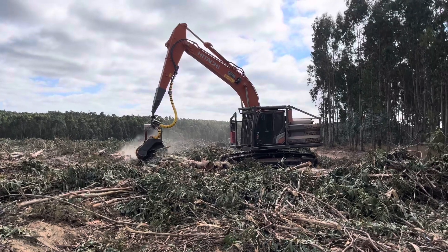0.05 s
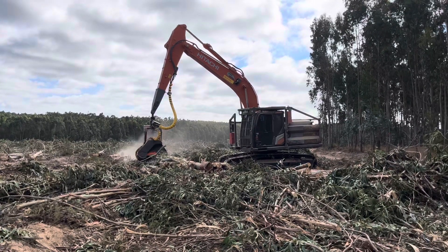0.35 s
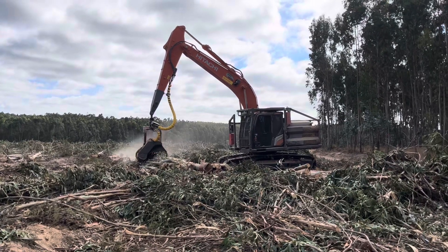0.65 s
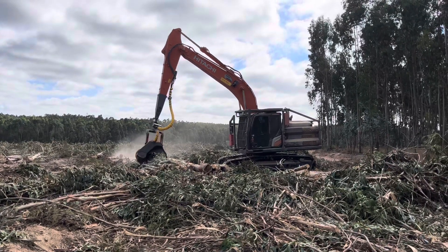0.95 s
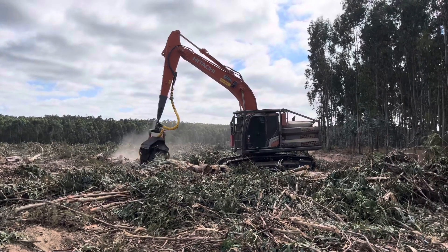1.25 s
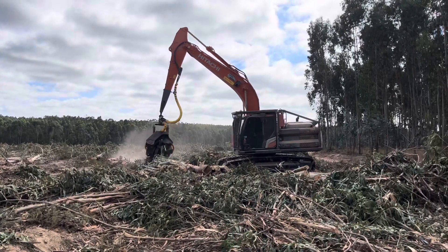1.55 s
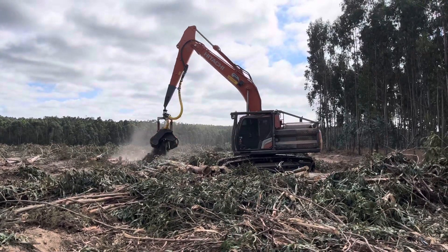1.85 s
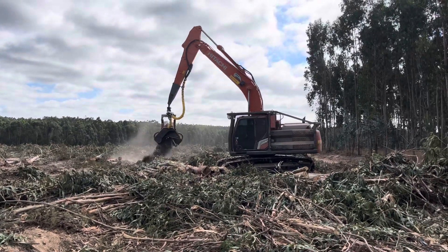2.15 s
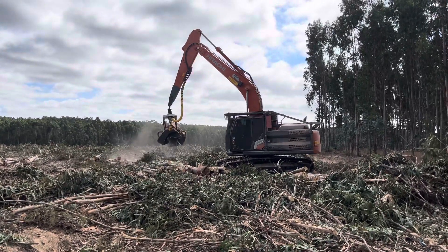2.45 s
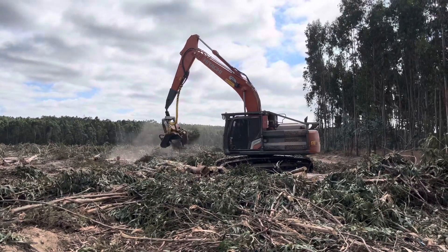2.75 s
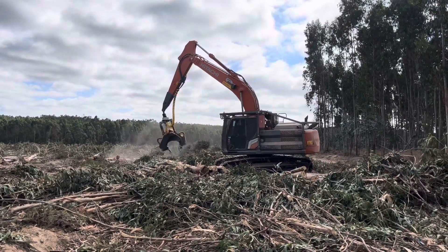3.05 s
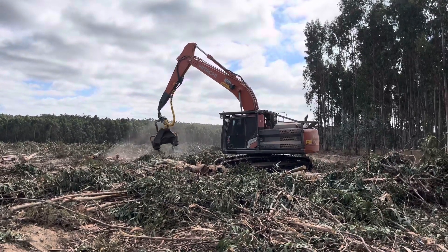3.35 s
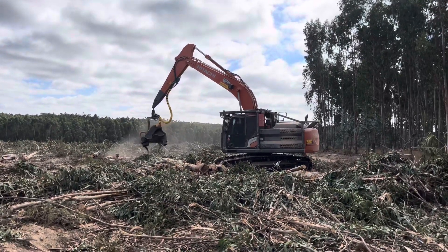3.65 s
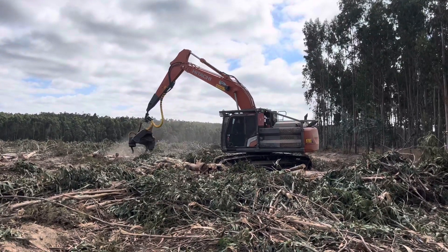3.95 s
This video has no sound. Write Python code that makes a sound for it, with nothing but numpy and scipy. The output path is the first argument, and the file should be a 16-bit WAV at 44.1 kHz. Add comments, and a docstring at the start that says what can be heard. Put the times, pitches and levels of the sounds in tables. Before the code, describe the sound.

A tracked excavator's diesel engine drones some way off in a cleared wood. Something briefly rubs beside the microphone with two soft bumps, then hydraulics whirr and hiss as logs thud and the harvesting head knocks and clacks.

```python
"""The diesel engine of a tracked excavator drones and roars some way off in a cleared wood.
Periodic firing gives the drone, the fan adds broadband noise, and the hydraulic pump hums and whirrs
at multiples of the shaft speed. Oil hisses as the boom moves, the machine groans under load, logs thud,
and the harvesting head knocks and clacks. In the first second something rubs right beside the
microphone, like a sliding hand, with two soft, dull bumps."""
import sys
import numpy as np
from scipy import signal
from scipy.fft import rfft, irfft
from scipy.io import wavfile

SR = 44100
rng = np.random.default_rng(int(sys.argv[2]) if len(sys.argv) > 2 else 0)


def int16_out(signal):
    """Quantize to a 16-bit WAV file."""
    q = np.round(np.clip(np.atleast_2d(signal).T, -1, 1) * 32767)
    wavfile.write(sys.argv[1], SR, q.astype(np.int16))


N = 176400
T, HZ = np.arange(N) / SR, np.fft.rfftfreq(N, 1 / SR)

# Noise spectra. Each row: frequency in Hz, relative spectral density in dB.
HISS_SPECTRUM = [(1500, -25), (3600, 2), (5000, -5), (6200, -4), (8300, -7.5), (9300, -2), (11000, 0),
                 (12000, -5.5), (13000, -24), (13600, -45)]
THUD_SPECTRUM = [(30, -28), (80, 4), (150, -9.5), (270, -3.5), (380, -6.5), (900, -19), (9000, -90)]
DULL_IMPACT_SPECTRUM = [(150, -10), (450, -6.5), (750, 5), (1000, -11), (1350, -18), (2500, -16),
                        (12000, -55)]
CRACK_SPECTRUM = [(500,-6),(1600,5),(3700,-4.5),(9000,-38)]
RUB_SPECTRUM = [(900,-9),(1500,-7),(2250,-2.5),(2750,-8),(3600,0),(5100,-2.5),(5900,-7.5),(7200,-7.5),(9000,-11),(10800,-2),(12000,-10),(13200,-20),(14500,-46)]
ROAR_SPECTRUM = [(20,-36),(30,-22),(45,3.5),(95,0.5),(220,-2.5),(265,-1.5),(345,-5.5),(430,0),(600,0),(760,0),(860,-3),(940,-14),(1020,-14.5),(1150,-6.5),(1330,-5),(1520,-14),(1800,-12),(2100,-15.5),(2550,-14),(3000,-22.5),(3700,-20.5),(4900,-23.5),(5800,-32),(7500,-37.5),(11500,-52),(13600,-69)]
RUMBLE_SPECTRUM = [(20, -34), (45, -7.5), (75, 6), (150, 2.5), (260, -5.5), (380, -32), (800, -58)]
# Envelopes. Each row: time in seconds, gain in dB.
GROAN_GAIN = [(.3,-33.5),(.42,-42.5),(.8,-38),(1.3,-47)]
HISS_GAIN = [(1.3, -51), (1.55, -44), (2.25, -45.5), (2.45, -48.5), (3.05, -44.5), (3.3, -45), (3.8, -42.5),
             (4, -45)]
WHIRR_GAIN = [(.8,-52),(1,-39),(1.35,-42),(2.55,-40),(3.1,-52)]
RUB_PRESSURE = [(.08, -69), (.12, -41.5), (.195, -26), (.24, -23), (.258, -18.5), (.28, -21), (.325, -26),
                (.348, -24), (.38, -30.5), (.47, -33), (.54, -36), (.575, -32.5), (.62, -40.5),
                (.68, -46.5), (.72, -35), (.785, -36), (.805, -39.5), (.9, -57)]
DRONE_GAIN = [(0,-33),(.18,-27.5),(.42,-28),(.53,-39),(.8,-57),(.9,-42.5),(1.8,-37.5),(2.2,-45.5),(2.6,-33),(2.75,-36.5),(3.29,-32),(3.39,-49),(3.68,-34),(4,-43)]
HUM_GAIN = [(.6,-2),(.9,-6),(1.55,-2.5),(2.7,-1),(4,-4)]
ROAR_GAIN = [(0, -33), (.4, -31), (.7, -32), (1.15, -31), (1.6, -29.5), (2, -30), (2.5, -29), (3.2, -28),
             (4, -28.5)]
RUMBLE_GAIN = [(0, -35), (.28, -30.5), (.7, -40.5), (.95, -35.5), (1.15, -48.5), (1.9, -37.5), (2.3, -44),
               (2.7, -45), (3.22, -32.5), (3.5, -40.5), (4, -35)]
# Far and near sound at the two microphone ports. Each row: frequency in Hz, coherence from 0 to 1,
# phase lead of the left in radians, left minus right level in dB.
FAR_FIELD = [(60,.65,-.2,.6),(160,.5,-1,0),(320,.78,0,-.3),(780,.96,.2,.6),(980,.25,-.3,.5),(1250,.94,.1,1.2),(1520,.45,1.2,2.5),(1750,.65,-1,7),(2050,.6,.9,-3),(2550,.75,1.4,-2),(2800,.46,.3,-6),(3700,.7,.8,-1.5),(5000,.43,1.7,4),(6000,.24,4,5.5),(7950,1,3.14,0),(9000,.72,1.95,-.7),(11200,.96,.1,0)]
NEAR_FIELD = [(1500,.4,-1,-3),(2300,.85,-.5,0),(3000,.72,.8,-1.5),(4100,.68,2.2,-6),(5100,.75,2,2),(6000,.35,3.8,3),(9000,.8,2,0),(10800,.78,.4,0),(12000,.92,-.1,0)]
# Log impacts. Each row: peak time in seconds, level in dB, pitch at the peak in Hz.
LOG_THUDS = [(0.264,-24,110),(.452,-20.5,170),(0.514,-25,170),(.777,-22.5,245),(.843,-25.5,130),(.992,-28,190),(1.297,-29,290),(1.465,-25,190),(1.614,-29.5,140),(1.773,-26,290),(1.859,-30.5,290),(1.886,-24,140),(1.943,-25,185),(2.872,-28.5,170),(3.218,-20,68.2),(3.332,-25,180)]
# Two soft bumps of the rubbing beside the microphone, then three knocks of the head on wood.
# Each row: peak time in seconds, level in dB, rise and decay times in seconds.
DULL_IMPACTS = [(0.569,-22.5,0.0085,0.033),(0.777,-28.5,0.02,0.011),(1.509,-25.5,.01,.02),(1.665,-29,0.0071,.015),(2.635,-34,.001,0.0038)]
# Snaps, clacks and a scrape. Each row: peak time in seconds, level in dB, ring in Hz, decay in seconds.
CLACK_EVENTS = [(0.555,-32.5,3510,0.0095),(0.783,-30.5,3430,0.012),(.99,-40,2320,0.012),(1.705,-34,2790,0.06),(2.793,-28,2300,0.0046),(2.813,-33,2260,0.0077),(2.823,-42,1900,.005),(2.843,-37,1360,.008)]
# Resonances of the rubbed body. Each row: frequency in Hz, width in Hz, boost in dB.
RUB_MODES = [(2290,110,6),(2880,140,9),(3450,100,7.5),(4600,62,7),(5120,98,6)]
# Engine speed. Each row: time in seconds, shaft turns per second.
SHAFT_SPEED = [(0, 31), (.45, 34.2), (.7, 32.3), (.95, 31.9), (2, 32.65), (3, 32.9), (4, 33.2)]
# Engine and pump tones. Each row: multiple of the shaft speed, relative level in dB.
HUM_ORDERS = [(9,-41.5),(16,-44.5),(18,-42.5),(23,-45),(24,-44),(36,-55)]
WHIRR_ORDERS = [(24.7, -1), (39.3, -6.5)]


def amp(db):
    """Amplitude grows tenfold for every 20 dB."""
    return 10 ** (np.asarray(db) / 20)


def unit(x):
    """Normalisation brings the rms to 1."""
    return x / np.sqrt(np.mean(x ** 2) + 1e-20)


def curve(points):
    """Linear interpolation turns a table into a control through time."""
    return np.interp(T, *np.transpose(points))


def spectrum(points, column=1):
    """Interpolation in log frequency spreads one column over the spectrum."""
    table = np.transpose(points)
    return np.interp(np.log(HZ + 1), np.log(table[0]), table[column])


def wander(rate_hz):
    """Low-passed noise gives a random fluctuation of rms 1."""
    hz = HZ[:N // 20]
    real, imag = rng.standard_normal((len(hz), 2)).T
    return unit(irfft((real + 1j * imag) / (1 + (hz / rate_hz) ** 4), N))


def noise(colour_db, field, drive=1):
    """Coloured noise of rms 1 reaches the two ports with partial coherence."""
    left, independent = rfft(rng.standard_normal((2, N)) * drive)
    coherence = np.clip(spectrum(field, column=1), 0, 1)
    right = coherence * left + np.sqrt(1 - coherence ** 2) * independent
    right *= np.exp(-1j * spectrum(field, column=2))
    balance = amp(spectrum(field, column=3) / 2)
    pair = np.array([left * balance, right / balance]) / np.sqrt(balance ** 2 + balance ** -2)
    return unit(irfft(pair * amp(colour_db), N))


def tone(turns, flutter=0.52, drift=0.15, apart=0.093, rasp=0.75):
    """Random amplitude and phase modulation make a tone waver and rasp, differently at each port."""
    shared = 1 + flutter * wander(6.0) + 1j * drift * wander(5.9)
    shared += rasp * (wander(19.7) + 1j * wander(23.4))
    per_port = np.array([wander(4.2) + 1j * wander(5.4) for _ in range(2)])
    return unit(((shared + apart * per_port) * np.exp(2j * np.pi * turns)).real)


def blow(peak_s, rise_s, decay_s):
    """An impact grows exponentially to its peak, then decays by damping."""
    return np.exp(np.minimum((T - peak_s) / rise_s, (peak_s - T) / decay_s))


def ring(hz, spread_turns=0.17):
    """One mode of a struck body reaches the two ports with a phase difference."""
    turns = np.cumsum(hz) / SR + rng.random() + spread_turns * rng.standard_normal((2, 1))
    return unit(np.sin(2 * np.pi * turns))


def groan(centre_hz=266.6, half_width_hz=27):
    """A low resonance of the loaded machine passes a narrow band of noise."""
    resonance_db = -20 * np.log10(1 + ((HZ - centre_hz) / half_width_hz) ** 2)
    return noise(resonance_db, FAR_FIELD) * amp(curve(GROAN_GAIN))


def oil_hiss(flicker_db=0.94):
    """Oil flowing through the valves radiates high-frequency noise as the boom moves."""
    return noise(spectrum(HISS_SPECTRUM), FAR_FIELD) * amp(curve(HISS_GAIN) + flicker_db * wander(28))


def pump_whirr(shaft_turns):
    """The loaded pump sounds rough tones whose frequencies are proportional to the shaft speed."""
    tones = sum(amp(db) * tone(order * shaft_turns) for order, db in WHIRR_ORDERS)
    return tones * amp(curve(WHIRR_GAIN))


def logs(max_fall_octaves_per_s=34):
    """Heavy damping leaves each tumbling log a few cycles of falling pitch in a dull puff of noise."""
    puff = noise(spectrum(THUD_SPECTRUM), FAR_FIELD) * amp(-5)
    thuds = 0
    for peak_s, db, hz in LOG_THUDS:
        octaves = np.clip(max_fall_octaves_per_s * rng.random() * (peak_s - T), -1, 1)
        envelope = amp(db) * blow(peak_s, rise_s=0.004, decay_s=0.0089)
        thuds += envelope * (puff + ring(hz * 2 ** octaves))
    return thuds


def bumps_and_knocks():
    """Damped contacts give dull noise bursts: the close rubbing bumps; later the head knocks on wood."""
    blows = sum(amp(db) * blow(peak_s, rise_s, decay_s) for peak_s, db, rise_s, decay_s in DULL_IMPACTS)
    return noise(spectrum(DULL_IMPACT_SPECTRUM), FAR_FIELD) * blows


def snaps_and_clacks(pitch_jitter=0.01455):
    """Impacts excite damped vibration: sticks snap, and the steel of the head clacks and scrapes."""
    crack = noise(spectrum(CRACK_SPECTRUM), FAR_FIELD)
    clacks = 0
    for peak_s, db, hz, decay_s in CLACK_EVENTS:
        ringing = amp(-1) * ring(hz * (1 + pitch_jitter * wander(146)))
        clacks += (crack + ringing) * amp(db) * blow(peak_s, 0.2 * decay_s, decay_s)
    scrape = noise(spectrum(HISS_SPECTRUM), FAR_FIELD) * amp(-38.5)
    return clacks + scrape * blow(peak_s=1.703, rise_s=0.02, decay_s=0.032)


def rubbing(grips=8, grip_s=0.11, mode_shift=0.025, echo_decay_s=0.0066, slip_db=1.37, treble_hz=7500):
    """Friction: tiny slips excite resonances that shift with the grip, brighter under more pressure."""
    modes_db = sum(db / (1 + (2 * (HZ - hz) / width) ** 2) for hz, width, db in RUB_MODES)
    slips = amp(slip_db * wander(110))
    grip = np.minimum(T / grip_s, grips - 1)
    rub = 0
    for k in range(grips):
        # Reflections round the hand interfere with the direct sound.
        echoes = rng.standard_normal(N) * np.exp(-T / echo_decay_s)
        reflected = amp(-1) * rfft(echoes) / np.linalg.norm(echoes)
        comb_db = 20 * np.log10(abs(1 + reflected) + 1e-3)
        shifted_db = np.interp(HZ * (1 + mode_shift * rng.standard_normal()), HZ, modes_db)
        crossfade = np.cos(np.clip(grip - k, -1, 1) * np.pi / 2)
        rub += crossfade * noise(spectrum(RUB_SPECTRUM) + shifted_db + comb_db, NEAR_FIELD, slips)
    pressure_db = curve(RUB_PRESSURE)
    treble = irfft(rfft(rub) / (1 + (treble_hz / (HZ + 1)) ** 6), N)
    brightness = amp(0.38 * (pressure_db + 43))  # unity at a pressure of -43 dB
    return (rub - treble + brightness * treble) * amp(pressure_db)


def engine(shaft_turns, firings_per_turn=2, low_cut_hz=180):
    """Periodic firing makes a drone and faintly modulates the fan's roar, amid harmonics and rumble."""
    firings = firings_per_turn * shaft_turns
    drone = amp(curve(DRONE_GAIN)) * tone(firings, flutter=0.11, drift=0.11, apart=0.42, rasp=0)
    hum = sum(amp(db) * tone(order * shaft_turns, flutter=0.34, drift=0.29, apart=0.16)
              for order, db in HUM_ORDERS)
    hum *= amp(curve(HUM_GAIN))
    throb = 1 + 0.019 * np.cos(2 * np.pi * firings) + 0.063 * wander(74)
    low_cut_db = -10 * np.log10(1 + (low_cut_hz / (HZ + 1)) ** 2)
    roar = noise(spectrum(ROAR_SPECTRUM) + low_cut_db, FAR_FIELD, throb)
    roar *= amp(curve(ROAR_GAIN) + 0.74 * wander(7.4))
    rumble = noise(spectrum(RUMBLE_SPECTRUM), FAR_FIELD) * amp(curve(RUMBLE_GAIN) + 1.5 * wander(12))
    return drone + hum + roar + rumble


def scene():
    """The distant machine, the logs and the close rubbing add by superposition."""
    shaft_turns = np.cumsum(curve(SHAFT_SPEED)) / SR
    machine = engine(shaft_turns) + pump_whirr(shaft_turns) + groan() + oil_hiss()
    return machine + logs() + bumps_and_knocks() + snaps_and_clacks() + rubbing()


def record(dry):
    """Soft saturation rounds the highest peaks, and a low-pass filter limits the band."""
    ceiling, cutoff_hz = 0.78, 14300
    rounded = dry / (1 + (dry / ceiling) ** 6) ** (1 / 6)
    taps = signal.firwin(511, cutoff_hz, window=("kaiser", 9), fs=SR)
    return signal.oaconvolve(rounded, taps[None], "same")


dry = scene()
out = record(dry)
int16_out(out)
```